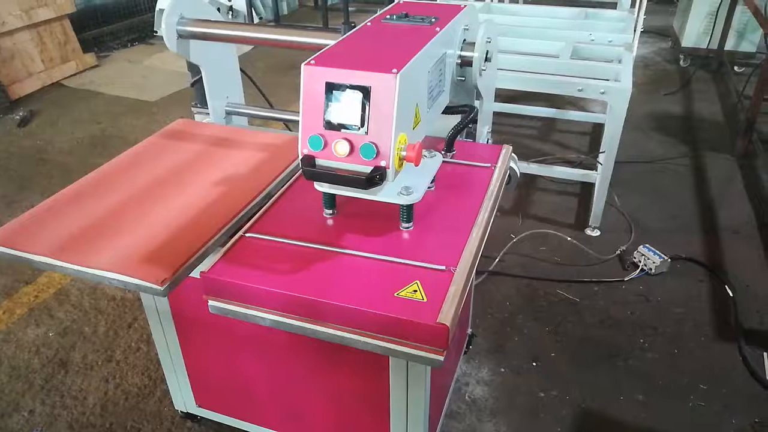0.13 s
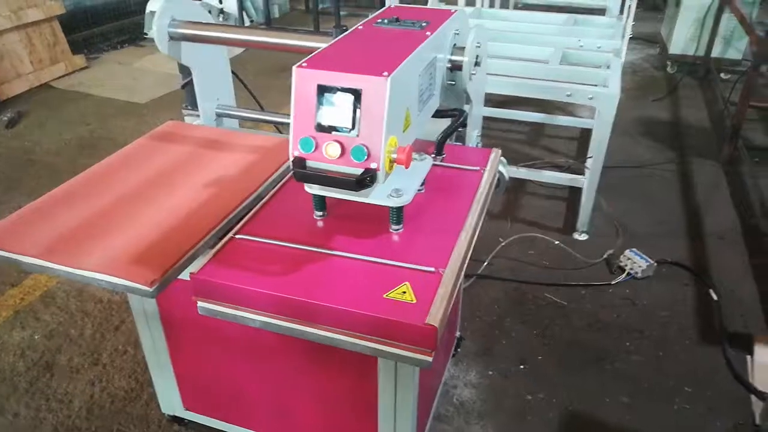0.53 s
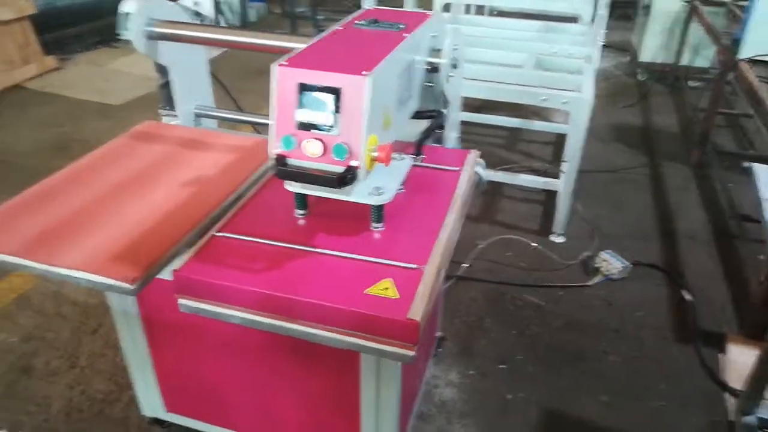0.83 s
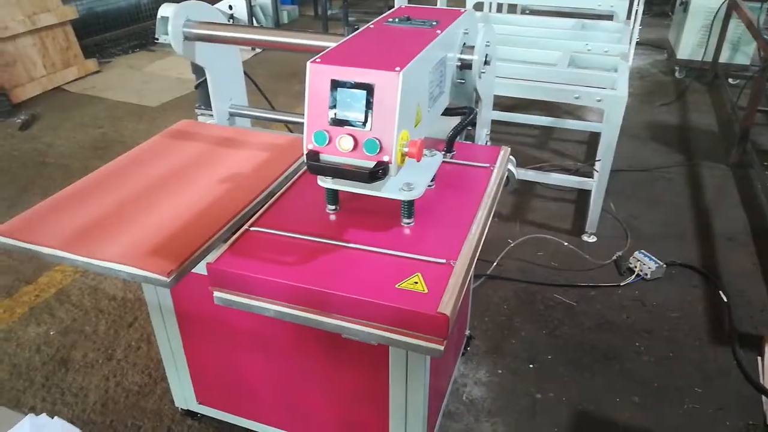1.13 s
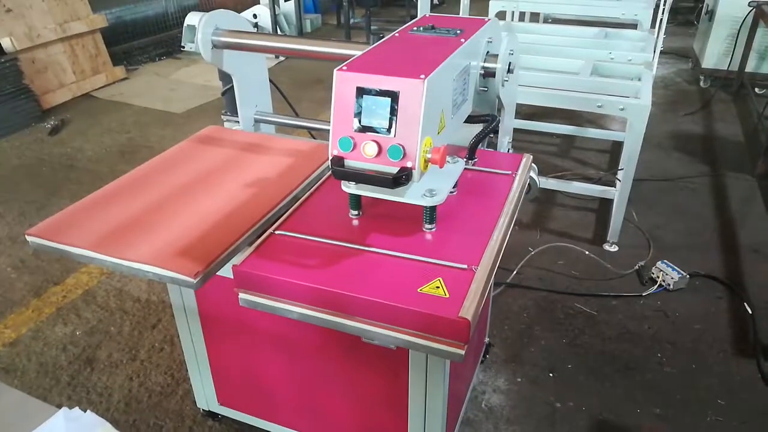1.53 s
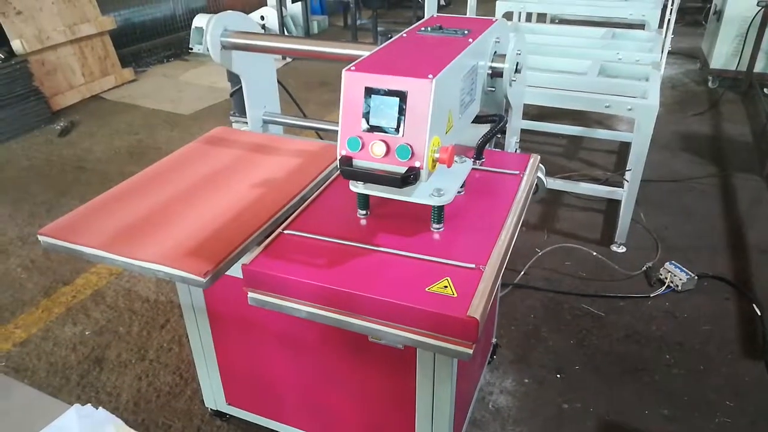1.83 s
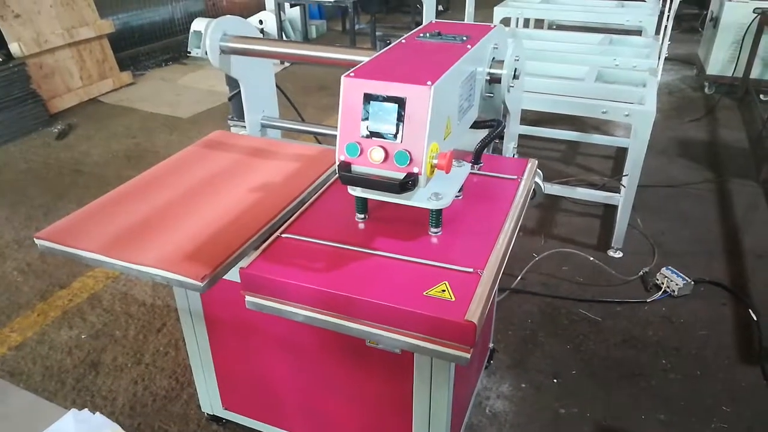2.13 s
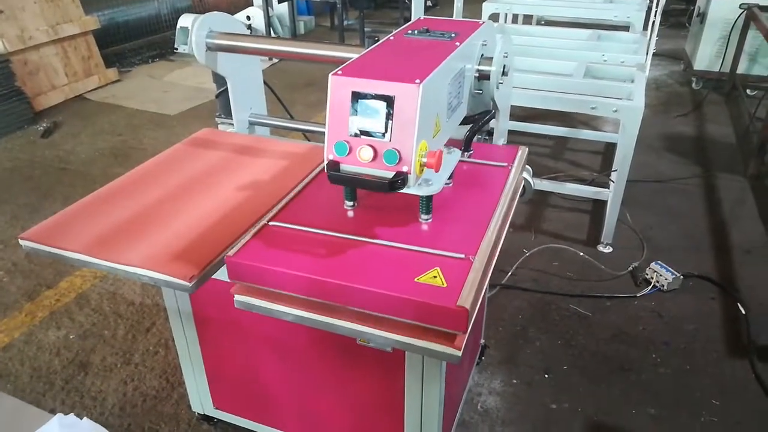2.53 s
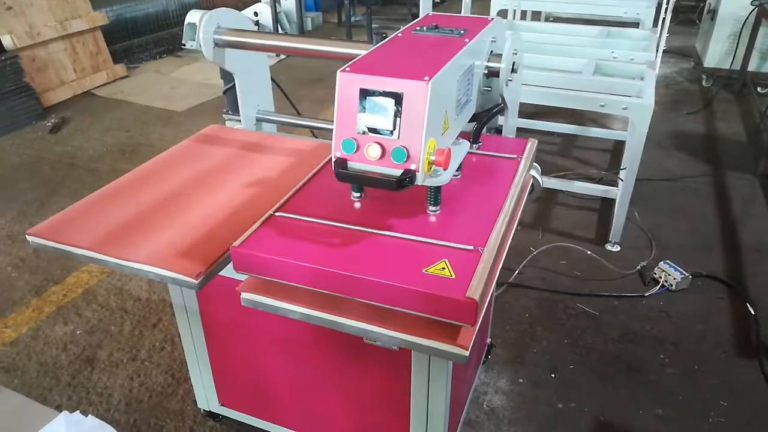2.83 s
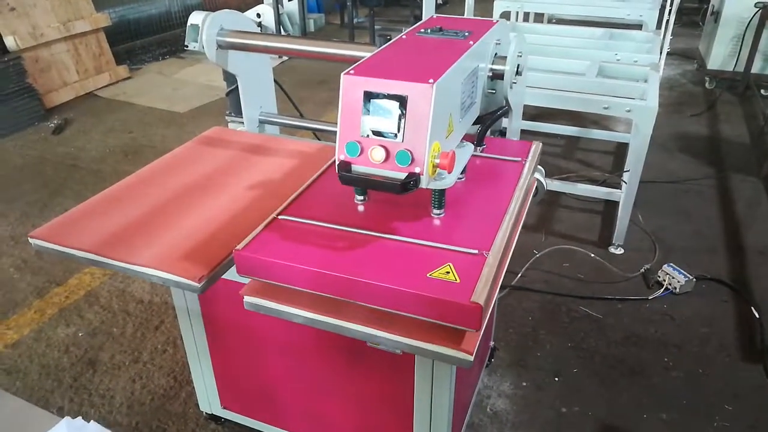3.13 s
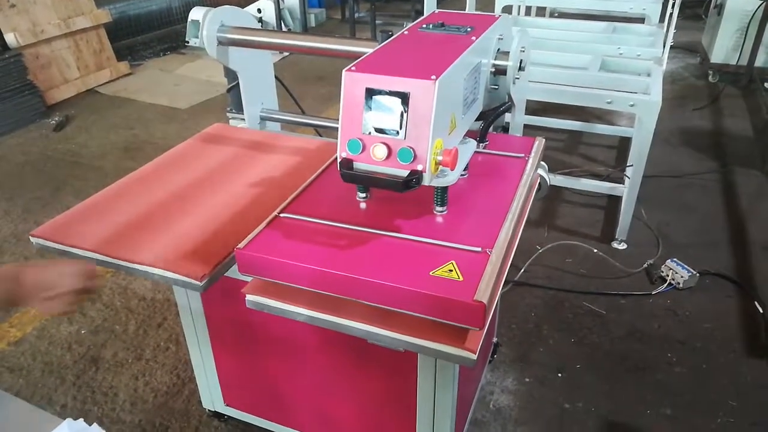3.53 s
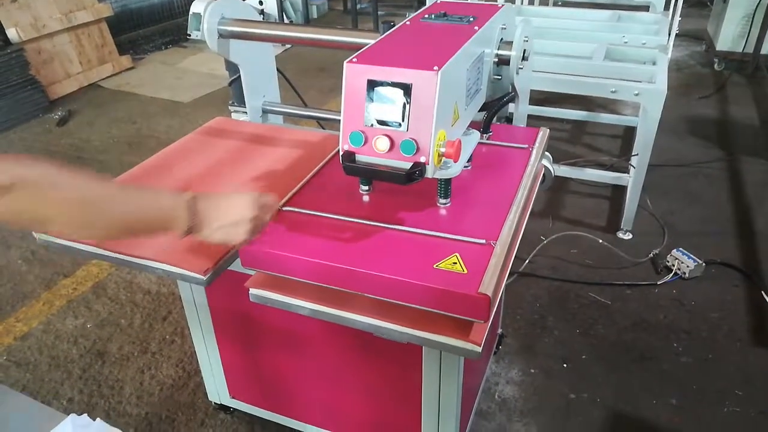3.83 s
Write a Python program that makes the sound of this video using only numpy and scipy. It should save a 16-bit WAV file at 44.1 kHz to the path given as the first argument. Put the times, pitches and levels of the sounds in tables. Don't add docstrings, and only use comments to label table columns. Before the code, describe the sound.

After a brief silence, machinery drones and hisses in a big hall, then rough wind rumble batters the close stereo microphone in waves, partly covering a short pneumatic release as the press plate lifts.

```python
import sys
import numpy as np
from scipy import signal
from scipy.fft import rfft, irfft
from scipy.io import wavfile
from scipy.ndimage import uniform_filter1d

SR = 44100
rng = np.random.default_rng(int(sys.argv[2]) if len(sys.argv) > 2 else 0)


def to_wav(sig):
    pcm = np.clip(np.atleast_2d(sig), -1, 1) * 32767
    pcm = np.round(pcm).astype(np.int16)
    wavfile.write(sys.argv[1], SR, pcm.T)


def volts_from_decibels(level):
    exponent = np.asarray(level, float) / 20
    return 10 ** exponent


N = 176400
T = np.arange(N) / SR


def at_hz(points, hz):
    p = np.array(points, float)
    return np.interp(np.log(np.maximum(hz, 1)), np.log(p[:, 0]), p[:, 1], left=p[0, 1])


def rms_one(x):
    return x / np.sqrt(np.mean(x ** 2) + 1e-20)


def colour(x, points):
    hz = np.arange(N // 2 + 1) * SR / N
    return irfft(rfft(x) * volts_from_decibels(at_hz(points, hz)) * (hz > 12), N)


def drift(rate_hz):
    step = 40
    r = np.exp(-2 * step * np.pi * rate_hz / SR)
    white = rng.standard_normal(N // step + 2002)
    slow = signal.lfilter([1], [1, -2 * r, r * r], white)[2000:]
    return np.interp(np.arange(N) / step, np.arange(len(slow)), rms_one(slow))


def resonance(x, hz, width_hz):
    r = np.exp(-np.pi * width_hz / SR)
    b = [1, 0, -1]
    a = [1, -2 * r * np.cos(2 * np.pi * hz / SR), r * r]
    once = signal.lfilter(b, a, x)
    return rms_one(signal.lfilter(b, a, once))


def diffuse():
    # (frequency [Hz], correlation [-1..1])
    likeness = [(60, 1), (180, 1), (550, 0.2), (1650, 0.041), (4970, 0.013), (15000, 0.036)]
    hz = np.arange(N // 2 + 1) * SR / N
    alike = np.clip(at_hz(likeness, hz), -.9, .985)
    mid, side = rfft(rng.standard_normal((2, N)))
    return irfft(np.sqrt(1 + alike) * mid + np.sqrt(1 - alike) * side * [[1], [-1]], N)


def panned(db):
    return volts_from_decibels(np.asarray(db) / 2 * np.array([[1], [-1]]))


def hall():
    # (frequency [Hz], density [dB per Hz])
    drone_colour = [(15, -57), (25, -9), (87, -6.5), (112, -1), (188, -3), (314, -3.5), (370, -5.5),
                    (642, -14), (2000, -14.5), (2600, -33), (4400, -120)]
    # (frequency [Hz], density [dB per Hz])
    hiss_colour = [(880, -0.5), (1500, -19.5), (2270, -1), (2980, -3), (3260, -1.5), (5280, -6),
                   (7660, -3.5), (9800, -18.5), (15700, -38.5)]
    # (frequency [Hz], width [Hz], level [dB])
    hums = [(118.9, 11.3, -44), (377, 20.4, -44.5), (1145, 600, -40.5)]
    # (time [s], level [dB])
    load = [
        (.28, 2),
        (.7, 1.5),
        (1.1, 0),
        (2, 0),
        (3, 0),
        (4, 0),
    ]
    # (time [s], left minus right [dB])
    hiss_pan = [
        (0, -7),
        (1.4, -2.5),
        (2.2, -2.5),
        (4, -1.5),
    ]

    load_db = np.interp(T, *np.transpose(load)) + .5 * drift(1.7)
    drone = volts_from_decibels(-32 + load_db) * rms_one(colour(diffuse(), drone_colour + [(4000, -64)]))
    hiss = rms_one(colour(diffuse(), [(700, -26)] + hiss_colour)) * volts_from_decibels(-35 + 0.2 * drift(2))
    hiss = hiss * panned(np.interp(T, *np.transpose(hiss_pan)))
    out = drone + hiss
    white = diffuse()
    for hz, width_hz, db in hums:
        out = out + volts_from_decibels(db + load_db + drift(9)) * resonance(white, hz, width_hz)
    return out


def jet(nozzle_hz, width_hz):
    # (frequency [Hz], density [dB per Hz])
    air_colour = [(1500, -10), (2600, -4), (4200, -3.5), (7200, -1.5), (8600, -0.5), (10500, -14.5),
                  (13300, -16.5), (15700, -24)]
    white = diffuse()
    air = rms_one(colour(white, [(600, -22)] + air_colour))
    body = air + volts_from_decibels(-8) * resonance(white, nozzle_hz, width_hz)
    return body * volts_from_decibels(1.4 * drift(25))


def air_lines():
    # (start [s], length [s], level [dB], left minus right [dB], whistle [dB])
    bursts = [
        (0.325, 0.19, -43, -7.5, -62),
        (0.84, 0.37, -41, -7.5, -63),
        (1.563, 0.21, -50, -8, -51),
        (2.522, .25, -39, 1, -68),
        (3.12, 0.11, -43, -7, -64),
    ]
    rise_s, fall_s = 0.12, 0.043
    out = 0
    body = jet(nozzle_hz=7670, width_hz=1740)
    whistle = resonance(diffuse(), hz=12740, width_hz=1200)
    for s, length, db, pan_db, whistle_db in bursts:
        rise = np.clip((T - s) / rise_s, 0, 1)
        fall = np.exp(-np.maximum(T - s - length, 0) / fall_s)
        out = out + rise * fall * panned(pan_db) * (volts_from_decibels(db) * body + volts_from_decibels(whistle_db) * whistle)

    vent_s, hold_s, close_s = 2.03, 0.4, 0.21
    since = np.maximum(T - vent_s, 0)
    opening = np.clip(since / 0.012, 0, 1)
    closing = np.exp(-np.maximum(since - hold_s, 0) / close_s)
    pop_db = 2.5 * np.exp(-since / 0.08)
    vent = opening * closing * volts_from_decibels(-35 + pop_db)
    return out + vent * panned(1.5) * (jet(nozzle_hz=6940, width_hz=900) + volts_from_decibels(-25) * whistle)


def eddies(points):
    # (frequency [Hz], level [dB])
    port_difference = [(30, -10), (60, -15), (120, -7), (250, -0.5), (450, 4.5), (800, 5)]
    eddies_per_s, spread_db, lump_db = 330, 3.3, 3
    kicks = (rng.random((2, N)) < eddies_per_s / SR) * rng.choice([-1, 1], (2, N))
    size_db = spread_db * np.minimum(rng.exponential(1, (2, N)), 3.5)
    kicks = kicks * volts_from_decibels(size_db + lump_db * drift(18))

    ahead = irfft(1j * rfft(kicks[0]), N)
    mid = colour(kicks[0], points)
    unlike = 0.12 * kicks[0] + 0.91 * ahead + 0.55 * kicks[1]
    side = colour(colour(unlike, points), port_difference)

    power = uniform_filter1d(uniform_filter1d(mid ** 2, size=4410), size=4410) / np.mean(mid ** 2)
    return (mid + side * [[1], [-1]]) / np.sqrt(np.mean(mid ** 2) * (power + .01) ** .7)


def spikes(gust_db):
    # (frequency [Hz], density [dB per Hz])
    spike_colour = [(60, -22), (200, -1), (400, 15.5), (700, -5.5), (1100, -11), (2500, -75)]
    spikes_per_s = 35
    born = rng.random(N) < spikes_per_s * volts_from_decibels(gust_db) / SR
    sizes = volts_from_decibels(3.5 * np.minimum(rng.exponential(1, N), 3.0)) * rng.choice([-1, 1, 1], N)
    left = rms_one(colour(born * sizes, spike_colour))
    return volts_from_decibels(-43 + 1.16 * gust_db) * left * [[1], [-0.32]]


def add_swing(out, s, hz, width, gains, sweep=0):
    reach_s = .04
    i = np.arange(max(int((s - reach_s) * SR), 0), min(int((s + reach_s) * SR), N))
    phase = (i / SR - s) * hz * 2 * np.pi
    spared = 1 - sweep * np.exp(-(phase / width / 2) ** 2)
    swing = np.sin(phase + .8) * np.exp(-(phase / width) ** 2)
    out[:, i] = out[:, i] * spared + gains * swing


def draught():
    # (time [s], strength [dB], lean to large eddies [dB])
    gusts = [(.85, -51, -27), (1.08, -3.5, -2), (1.24, -2.5, 2.5), (1.31, 6.5, 6.5), (1.46, 5, -0.5),
             (1.62, -4, 6), (1.85, 5.5, 2.5), (2.02, 5.5, 2), (2.2, -1, -1.5), (2.359, -4, 2.5),
             (2.45, 5.5, 0.5), (2.63, -6, 0.5), (2.94, -3.5, 9), (3.03, 6.5, 2), (3.27, 5.5, 5),
             (3.58, -5, 3), (3.74, 6.5, 4.5), (3.92, -0.5, 3.5)]
    # (frequency [Hz], density [dB per Hz])
    rumble_colour = [(20, -3), (40, 5), (70, 7), (120, 1.5), (200, -2), (400, -21.5), (1500, -100)]
    # (frequency [Hz], density [dB per Hz])
    flutter_colour = [(50, -24.5), (120, 3.5), (220, 0.5), (400, -9), (700, -21.5), (1100, -27.5),
                      (2500, -95)]
    # (time [s], peak [dB], swing [Hz])
    thumps = [(1.3, -15, 188), (1.344, -11, 88.5), (1.41, -7, 107), (1.482, -11.5, 89), (1.539, -14.5, 80),
              (1.854, -16, 90), (1.883, -8.5, 120), (1.974, -10.5, 172), (2.091, -12.5, 121),
              (2.47, -11, 152), (2.494, -15, 219), (3.038, -13, 111), (3.069, -9.5, 84), (3.149, -10, 72),
              (3.212, -10, 111), (3.279, -4.5, 161), (3.727, -10.5, 171), (3.771, -16, 131),
              (3.84, -13.5, 136), (3.987, -13.5, 95)]
    # (time [s], peak [dB], left minus right [dB])
    flicks = [(1.301, -13, 5), (1.33, -20, 7), (1.36, -17, 6), (1.49, -14, 10), (1.80, -17, 8),
              (1.893, -17.5, 8), (1.973, -11, 7.5), (1.988, -10, 4), (2.115, -13.5, 9), (2.43, -14, 5.5),
              (2.494, -14, 6), (3.03, -18, 2), (3.195, -11.5, 6.5), (3.272, -16, 5), (3.43, -13, 5),
              (3.659, -14, 8), (3.71, -11, 7.5), (3.747, -9, 9), (3.777, -13, 11.5), (3.955, -10.5, -8)]

    s, strength, lean = np.transpose(gusts)
    gust_db = np.interp(T, s, strength)
    lean_db = np.interp(T, s, lean)
    rumble = volts_from_decibels(-28.5 + 0.84 * gust_db + lean_db) * eddies(rumble_colour)
    flutter = volts_from_decibels(-32 + 1.54 * gust_db) * eddies(flutter_colour)
    onset_s, rise_s = .75, .05
    out = (rumble + flutter + spikes(gust_db)) / (1 + np.exp(-(T - onset_s) / rise_s))

    signs = rng.choice([-1, 1], len(thumps))
    for (s, db, hz), sign in zip(thumps, signs):
        add_swing(out, s, hz, 3.0, sign * volts_from_decibels(db + 2.5), sweep=.6)
    for s, db, pan_db in flicks:
        opposed = panned(pan_db) * [[1], [-1]]
        add_swing(out, s, 473, 2.5, volts_from_decibels(db) * opposed)
    return out


def scene():
    return hall() + air_lines() + draught()


def top_cut(x):
    return signal.sosfilt(signal.butter(12, 15850, fs=SR, output="sos"), x)


def record(dry):
    start_s = .2787
    knee_db, squeeze, recover_db_per_s, attack_s = -31, 0.29, 26, 0.047
    power = uniform_filter1d(np.mean(dry ** 2, axis=0), size=2205)
    level_db = 10 * np.log10(power + 1e-12)
    over = np.maximum(level_db - knee_db, 0) * squeeze
    held = np.maximum.accumulate(over + recover_db_per_s * T) - recover_db_per_s * T
    r = np.exp(-1 / (attack_s * SR))
    gain = volts_from_decibels(-signal.lfilter([1 - r], [1, -r], held))
    return top_cut(dry * gain * (T >= start_s))


dry = scene()
out = record(dry)
to_wav(out)
```